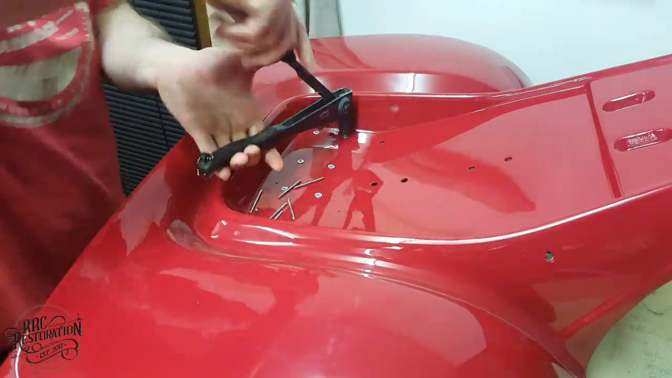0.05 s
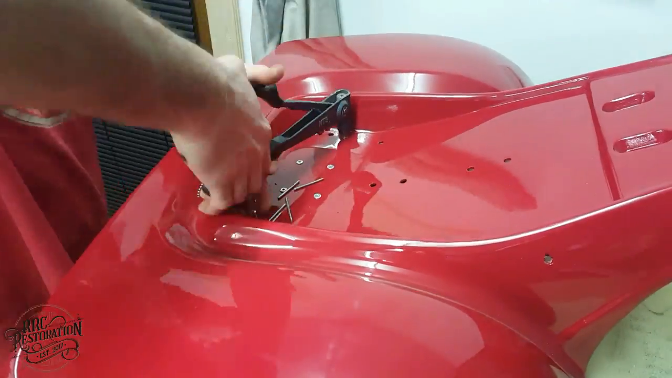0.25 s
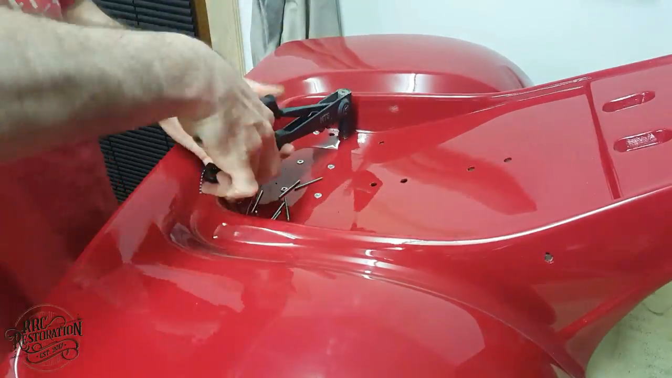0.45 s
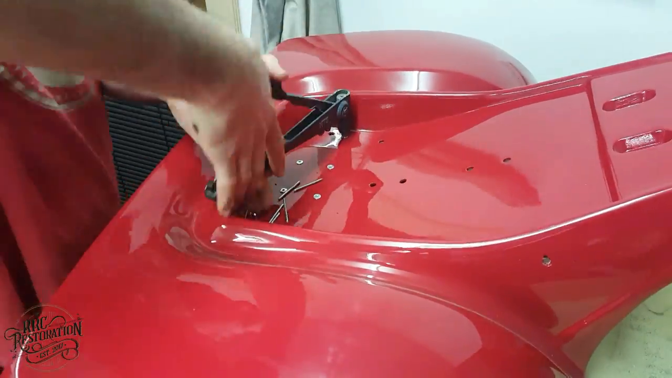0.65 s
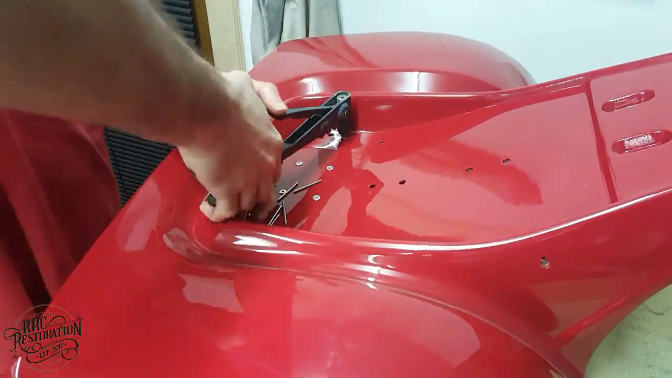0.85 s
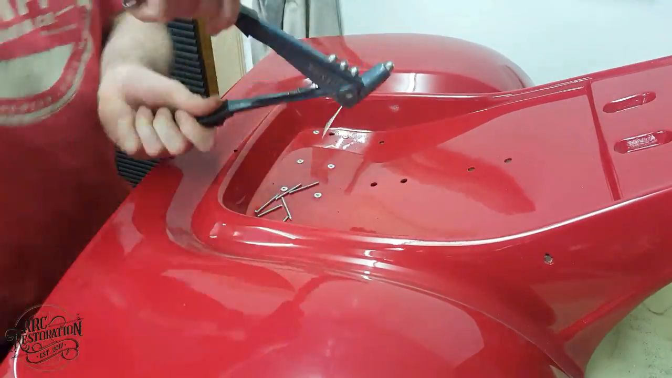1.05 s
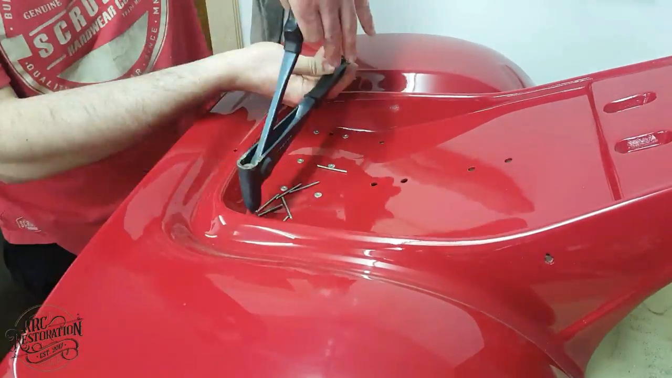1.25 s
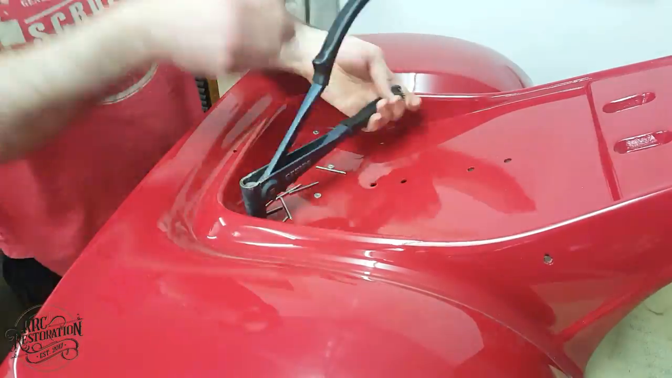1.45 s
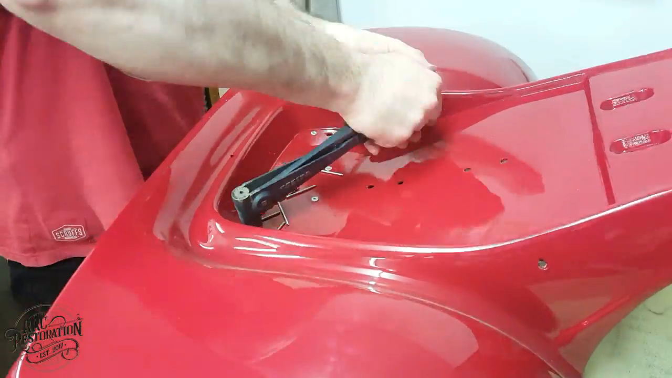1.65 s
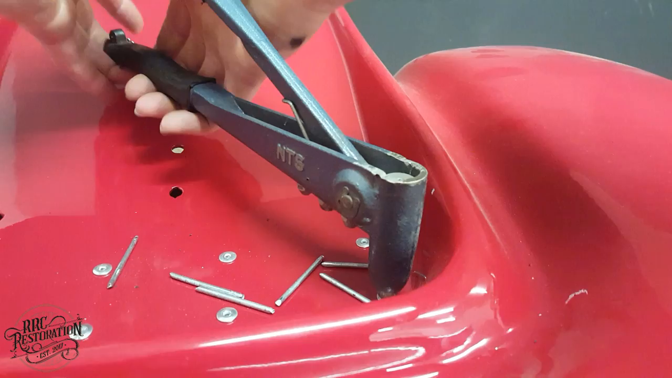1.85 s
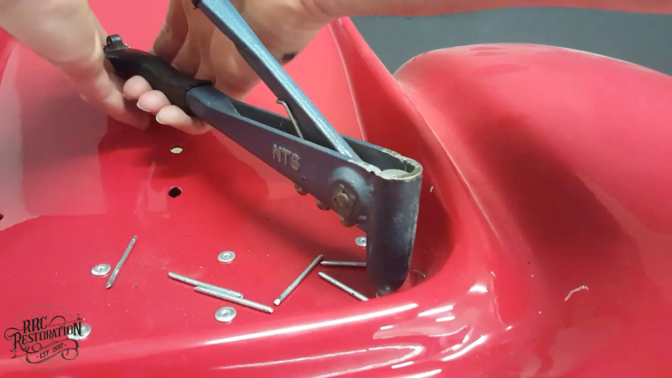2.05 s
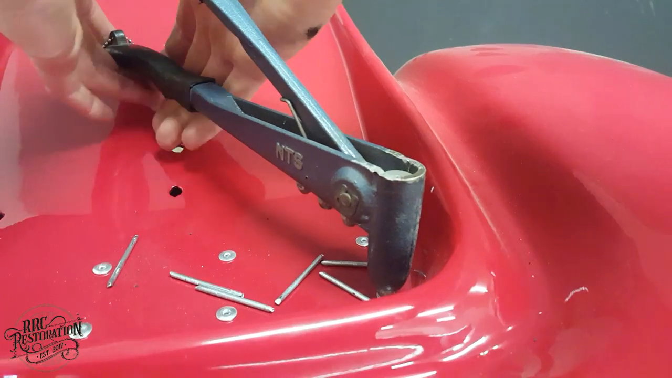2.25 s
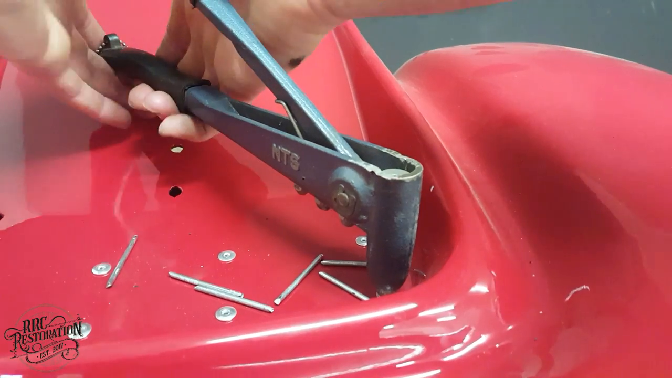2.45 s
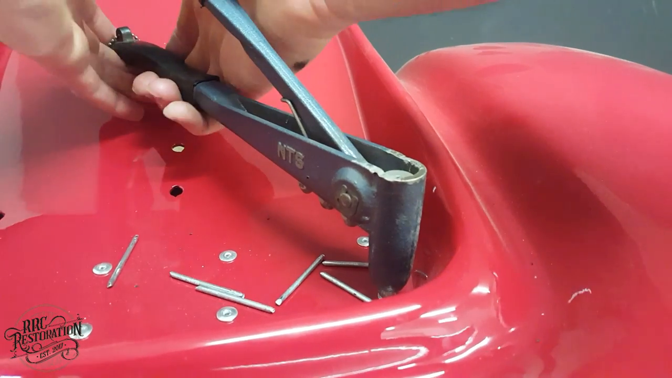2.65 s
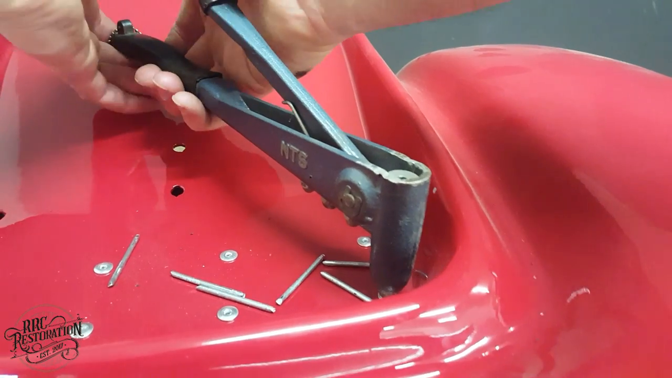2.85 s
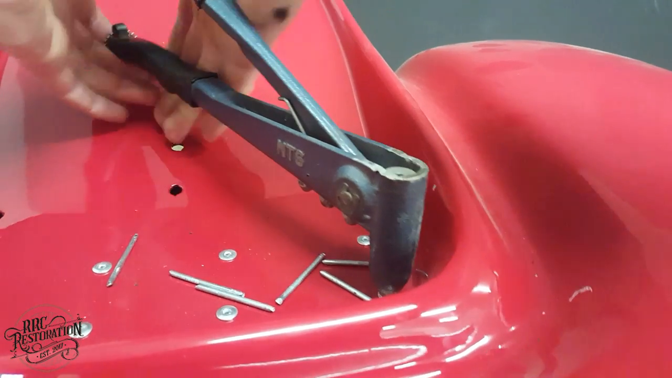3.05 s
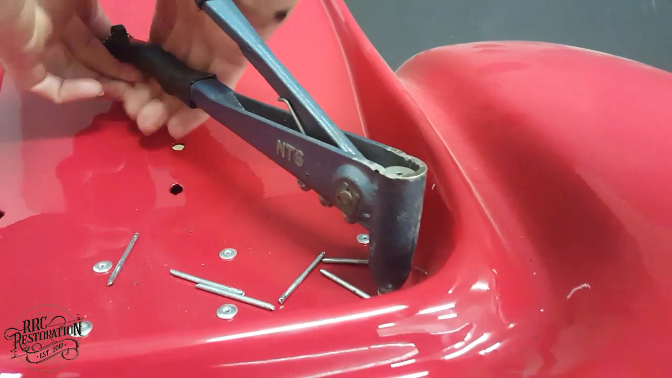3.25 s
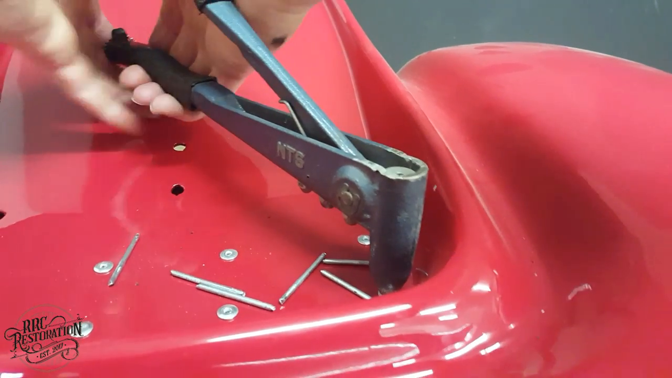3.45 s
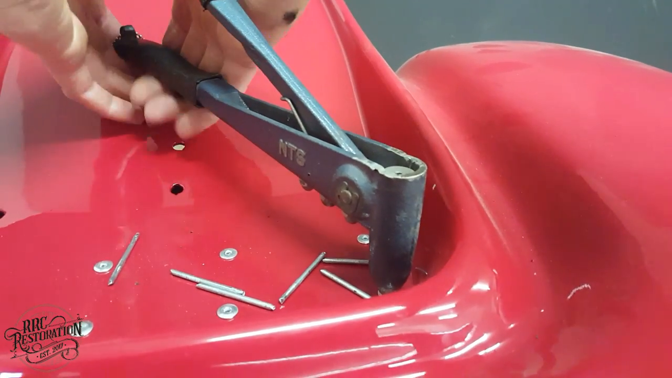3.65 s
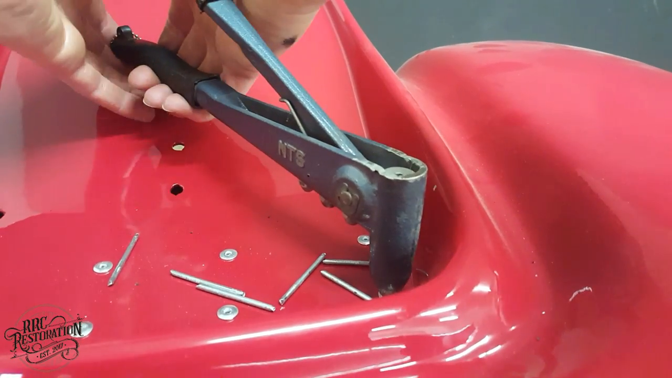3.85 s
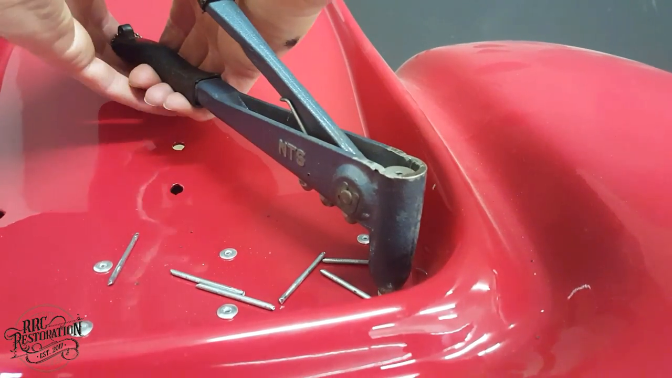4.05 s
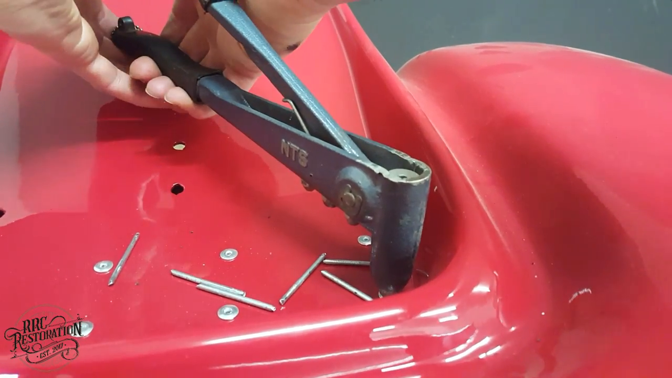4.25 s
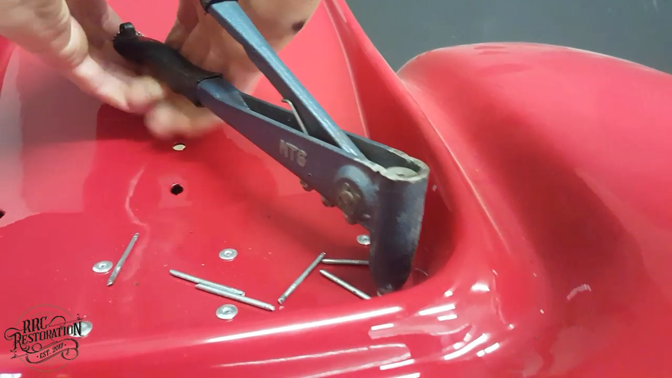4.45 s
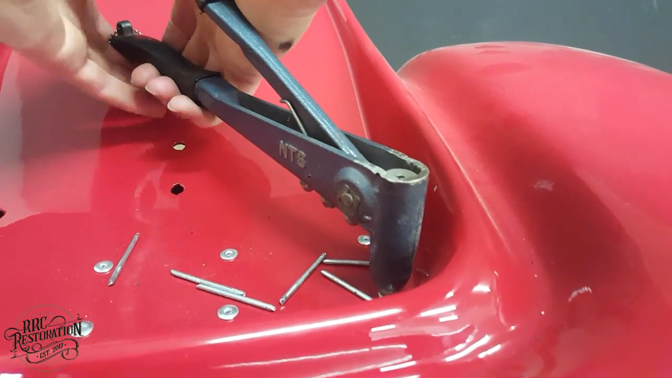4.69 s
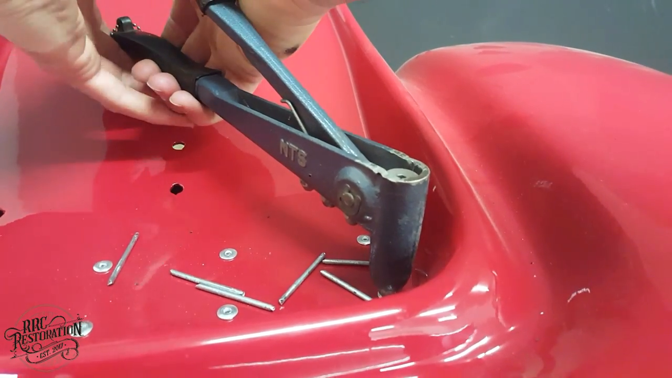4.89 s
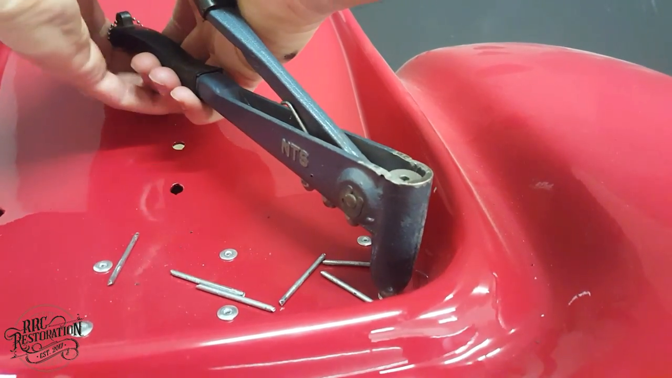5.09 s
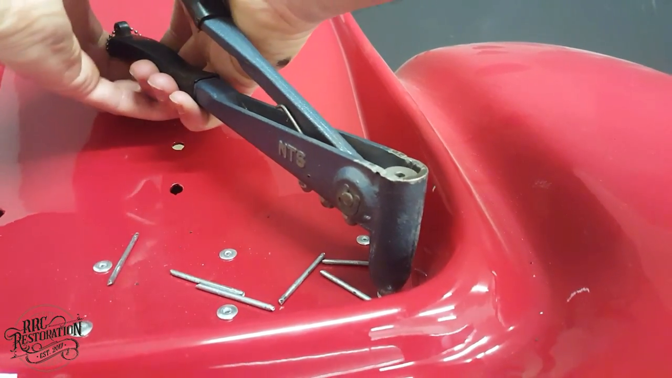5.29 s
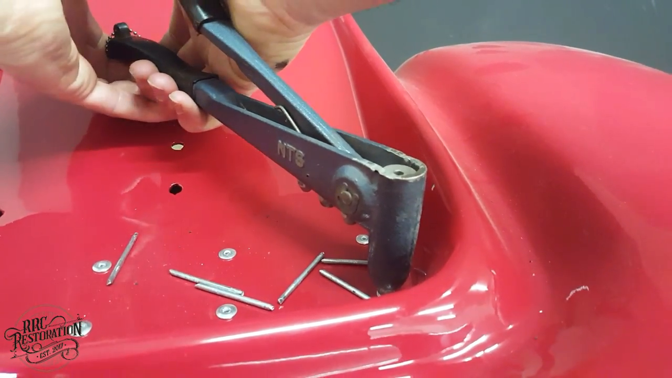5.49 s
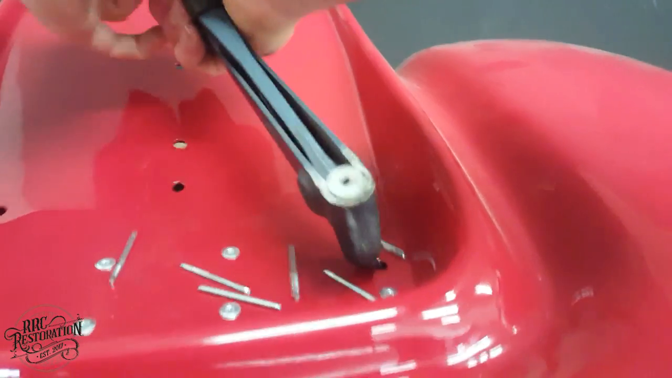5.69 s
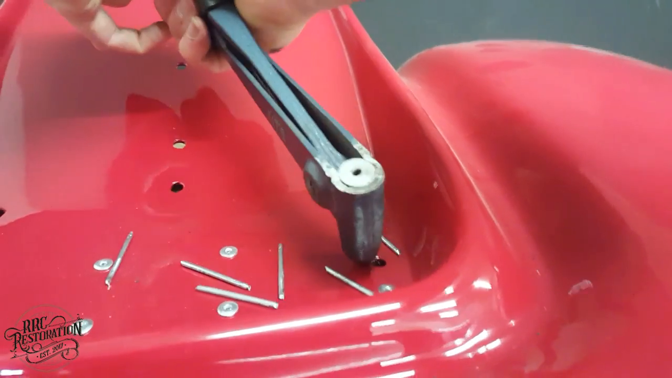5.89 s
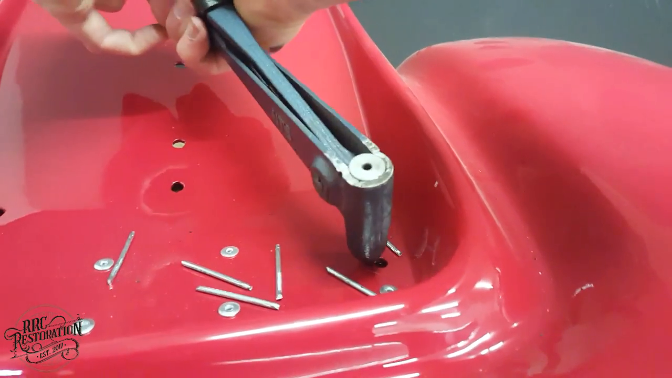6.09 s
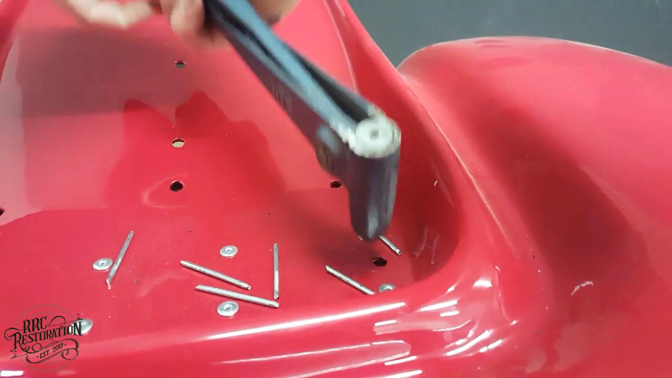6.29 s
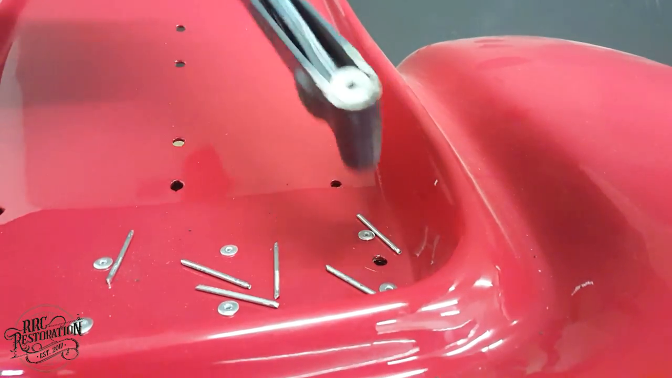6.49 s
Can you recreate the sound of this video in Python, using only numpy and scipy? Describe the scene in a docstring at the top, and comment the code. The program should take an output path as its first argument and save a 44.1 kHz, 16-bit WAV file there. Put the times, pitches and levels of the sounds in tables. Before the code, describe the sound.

A close microphone in a quiet, moderately reverberant workshop. Right at the start a steel hand riveter lands on a hollow fibreglass shell with a thin knock, then bumps and clinks lightly among loose rivets; a heavier low thud falls at 0.6 s. Around 1.0 s comes a sharp hard clack, at 1.15 s a bright steel rattle, and at 1.4 s and 1.8 s full hollow thumps with small bumps around them. From 2 to 4.8 s the seated tool is nudged with soft boxy taps, faint scuffs and clinks; a moderate dull snap comes at 2.85 s. A dry tick sounds at 4.3 s. A faint low wavering hum swells from 4.5 s and sags; quick steel ticks cluster from 5.3 to 5.6 s. At 5.64 s the stem breaks: a huge overloaded crack with immediate recoil, shell ring and room decay of about half a second. Barely audible clinks remain until about 6.5 s.

```python
"""A hand riveter works on a hollow fibreglass shell until the rivet's stem breaks: bursts of tiny impacts excite
resonances, the shell rings as decaying sines, and band-wise decaying noise fills the room with the bang.
Before it the tool knocks the shell (impacts through broad modes), nudges its hole, and its steel jaws tick.
Loose rivets clink and hands fumble; behind them lie filtered noise and a low wavering hum.
Diffuse reflections surround the contacts, and the microphone overloads on the loudest peaks."""
import sys
import numpy as np
from scipy import signal
from scipy.fft import rfft, irfft, next_fast_len
from scipy.io import wavfile

SR = 44100
rng = np.random.default_rng(int(sys.argv[2]) if len(sys.argv) > 2 else 0)


def generate_wav(signal):
    """Clip the signal to [-1, 1] and save it as 16-bit WAV at the path in sys.argv[1]."""
    frames = np.transpose(np.atleast_2d(signal))
    scaled = np.clip(frames, -1, 1) * 32767
    pcm = np.round(scaled).astype(np.int16)
    wavfile.write(sys.argv[1], SR, pcm)


N = 287957
TIME = np.arange(N) / SR


def from_db(db):
    """Level to amplitude: 20 dB is a factor of ten."""
    return 10 ** (np.asarray(db) / 20)


def rms_one(x):
    """Power normalisation: scale to unit rms."""
    return x / np.sqrt(np.mean(x ** 2) + 1e-30)


def unit_energy(x):
    """Energy normalisation: scale the sum of squares to one."""
    return x / np.sqrt(np.sum(x ** 2) + 1e-30)


def at_hz(points, hz):
    """Logarithmic frequency scale: interpolate a table along it."""
    f, value = np.transpose(points)
    return np.interp(np.log(np.maximum(hz, 1)), np.log(f), value)


def add(out, s, sound):
    """Superposition: mix a sound in at s seconds."""
    i = max(int(s * SR), 0)
    out[i:i + len(sound)] += sound[:N - i]


def band(x, low, high, order=3):
    """Causal band-pass filtering between two corner frequencies."""
    return signal.sosfilt(signal.butter(order, [low, high], "band", fs=SR, output="sos"), x)


def lowpass(x, hz, order=1):
    """Causal low-pass filtering, with the corner held below SR / 3."""
    return signal.sosfilt(signal.butter(order, min(hz, SR / 3), fs=SR, output="sos"), x)


def highpass(x, hz, order=2):
    """Causal high-pass filtering above a corner frequency."""
    return signal.sosfilt(signal.butter(order, hz, "high", fs=SR, output="sos"), x)


def steady_noise(colour):
    """Spectral shaping: white noise weighted in frequency, rms 1."""
    weight = from_db(at_hz(colour, np.fft.rfftfreq(N, 1 / SR)))
    return rms_one(irfft(rfft(rng.standard_normal(N)) * weight, N))


def dying_noise(colour, t60s, size=SR):
    """High modal density: noise in third-octave bands, each with its own decay; unit energy."""
    edges = 40 * 2 ** (np.arange(27) / 3)
    out = np.zeros(size)
    for low, high in zip(edges, edges[1:]):
        hz = np.sqrt(low * high)
        fade = from_db(-60 * TIME[:size] / at_hz(t60s, hz))
        noise = band(rng.standard_normal(size) * fade, low, high, order=2)
        # the colour is a level per hertz, so energy grows with bandwidth
        out += unit_energy(noise) * np.sqrt(high - low) * from_db(at_hz(colour, hz))
    return unit_energy(out)


def ring(modes, vary_db, size=SR):
    """Free vibration: exponentially decaying sines whose strengths and signs vary from strike to strike."""
    hz, db, t60 = np.transpose(modes)[:, :, None]
    strength = from_db(db + vary_db * rng.standard_normal(db.shape)) * rng.choice([-1, 1], db.shape)
    decay = from_db(-60 * TIME[:size] / t60)
    return np.sum(strength * decay * np.sin(2 * np.pi * hz * TIME[:size]), axis=0)


def resonate(x, modes):
    """Modal superposition: parallel two-pole resonances with alternating signs."""
    out = 0
    for k, (hz, width, db) in enumerate(modes):
        r = np.exp(-np.pi * width / SR)
        poles = [1, -2 * r * np.cos(2 * np.pi * hz / SR), r * r]
        peak_one = (1 - r * r) / 2
        out = out + (-1) ** k * from_db(db) * peak_one * signal.lfilter([1, 0, -1], poles, x)
    return out


def tinted(x, hz, width_hz, db):
    """Resonant equalisation: raise or lower one region of the spectrum."""
    return x + (from_db(db) - 1) * resonate(x, [(hz, width_hz, 0)])


# corners of the four registers boom, body, clack and crack: (frequency [Hz])
REGISTER_EDGES = [30, 380, 1300, 4500, 17000]
LEVEL_WINDOW_S = .02  # each register's energy is given as its rms level over this time


def contacts(rows, modes, register_db, strike_db, bare_db, bare_hz, rise, settle_db, settle_s, settle_hz,
             lowest_hz, grain_db=2.5, flex_db=-26, size=8192):
    """Impact excitation: a flurry of tiny impacts drives resonances; hardness tilts the four registers."""
    out, t = np.zeros(N), TIME[:size]
    registers = [signal.butter(3, edges, "band", fs=SR, output="sos")
                 for edges in zip(REGISTER_EDGES, REGISTER_EDGES[1:])]
    for s, chatter_s, level_db, hardness_db in rows:
        force, grain, tremble = rng.standard_normal((3, size))
        envelope = (t / chatter_s) ** rise * np.exp(-t / chatter_s)
        flurry = envelope * force * from_db(grain_db * grain)
        # one impact at the height of the flurry is added
        flurry[int(rise * chatter_s * SR)] += from_db(strike_db) * np.sqrt(np.sum(flurry ** 2))
        # afterwards the parts settle with a duller tremble
        settling = lowpass(tremble, settle_hz) * np.exp(-t / settle_s) * (1 - np.exp(-t / chatter_s))
        impacts = flurry + from_db(settle_db) * settling
        # part of the force is heard bare, rounded by the contact's softness
        sound = resonate(impacts, modes) + from_db(bare_db) * lowpass(impacts, bare_hz)
        # below its lowest mode the body only flexes a little
        flex = from_db(flex_db) * lowpass(impacts, lowest_hz, order=2)
        sound = highpass(sound, lowest_hz, order=3) + flex
        # a harder contact is brighter: the tilt pivots between boom and body
        levels = [level_db + db + hardness_db * (k - .5) for k, db in enumerate(register_db)]
        blow = sum(from_db(db) * unit_energy(signal.sosfilt(sos, sound)) for sos, db in zip(registers, levels))
        add(out, s, blow * np.sqrt(LEVEL_WINDOW_S * SR))
    return out


# brief drops of the background: (time [s], depth [dB], recovery time [s])
DIPS = [(1.0, 8, 0.12), (5.651, 12.5, 1)]


def dips():
    """Gain modulation: the background sinks quickly and comes back more slowly."""
    db = 0
    for s, depth_db, recovery_s in DIPS:
        age = np.maximum(TIME - s, 0)
        attack = 1 - np.exp(-age / .015)
        db = db - depth_db * attack * np.exp(-(age / recovery_s) ** 2)
    return from_db(db)


HUM_HZ = 72
HUM_START_S, HUM_ATTACK_S, HUM_END_S, HUM_RELEASE_S = 4.5, 0.44, 5.6, .09
HUM_DB, HUM_SAG_DB_PER_S = -48.5, 9  # the sag counts from the start


def hum_level():
    """Amplitude envelope: the hum swells under the last squeeze, sags, and dies around the stem's break."""
    age = TIME - HUM_START_S
    attack = np.clip(age / HUM_ATTACK_S, 0, 1)
    release = np.exp(-np.maximum(TIME - HUM_END_S, 0) / HUM_RELEASE_S)
    return attack * from_db(HUM_DB - HUM_SAG_DB_PER_S * age) * release


def low_hum(width_hz):
    """Phase modulation: the phase of narrow-band noise makes a tone of wandering pitch and steady strength."""
    narrow = band(rng.standard_normal(N), HUM_HZ - width_hz / 2, HUM_HZ + width_hz / 2, order=2)
    phase = np.angle(signal.hilbert(narrow, next_fast_len(N))[:N])
    return hum_level() * np.sqrt(2) * np.cos(phase)


# spells of fumbling over tool and shell: (start [s], end [s], level [dB])
HANDLING = [(0, .005, -40.5), (.03, .95, -60), (1.321, 1.655, -52.5), (1.83, 2.519, -63.5),
            (3.052, 3.702, -64.5), (4.5, 5.198, -66.5)]
HANDLING_FADE_S, HANDS_STILL_DB = 0.049, -72.5


def hand_activity():
    """Envelope control, in dB: each spell holds its level and fades exponentially at both ends."""
    gain = from_db(HANDS_STILL_DB)
    for start, end, db in HANDLING:
        outside_s = np.abs(TIME - np.clip(TIME, start, end))
        gain = np.maximum(gain, from_db(db) * np.exp(-outside_s / HANDLING_FADE_S))
    return 20 * np.log10(gain)


# relative spectrum of brushing sleeves: (frequency [Hz], level [dB])
RUSTLE_COLOUR = [(80, -7.5), (220, 13), (500, 1.5), (1000, -3), (2000, -9), (4000, -16), (8000, -29),
                 (15000, -36.5)]
RUSTLE_DB, RUSTLE_FOLLOWS = -64.5, 0.55  # level while hands are still, share of their swing in dB


def sleeve_rustle(activity_db):
    """Friction noise: shaped noise that grows as the hands get busier."""
    level_db = RUSTLE_DB + RUSTLE_FOLLOWS * (activity_db - HANDS_STILL_DB)
    return from_db(level_db) * steady_noise(RUSTLE_COLOUR)


# relative spectrum of the room noise: (frequency [Hz], level [dB])
FLOOR_COLOUR = [(25, -6.5), (65, -0.5), (130, -7), (230, -17), (500, -23), (1300, -34.5), (4000, -35.5),
                (15000, -43)]


def background(activity_db, floor_db, hum_width_hz):
    """Incoherent superposition: room noise and rustle share the dips; the hum does not."""
    rustle = sleeve_rustle(activity_db)
    floor = from_db(floor_db) * steady_noise(FLOOR_COLOUR)
    return dips() * (floor + rustle) + low_hum(hum_width_hz)


# reverberation time of the room: (frequency [Hz], t60 [s])
ROOM_T60 = [(100, 0.36), (250, 0.57), (600, 0.59), (1100, 0.6), (2000, .46), (4200, 0.41), (7700, .35),
            (11000, 0.04), (15000, .23)]


def workshop(x, wall_hz, first_echo_s):
    """Diffuse reverberation: convolution with decaying noise, dulled by the walls."""
    response = dying_noise([(100, 0.0084), (10000, 0.0028)], ROOM_T60)  # practically flat colour
    gather = 1 - np.exp(-(TIME[:SR] / first_echo_s) ** 2)
    return signal.fftconvolve(x, lowpass(response, wall_hz) * gather)[:N]


# broad resonances of the struck shell: (frequency [Hz], width [Hz], level [dB])
KNOCK_MODES = [(204.6, 39, -9.5), (427, 47, -2.5), (605, 120, -0.5), (940, 170, -2.5), (1117, 140, -10),
               (1760, 17, -16), (1780, 45, -12), (2836, 190, -10.5), (2980, 210, -32.5), (5840, 230, -38.5)]


def fumbling(activity_db, per_s, spread_db, bare_db, bare_hz, scuff_s):
    """Shot noise: random touches start decaying scuffs that sound through the shell."""
    touches = (rng.random(N) < per_s / SR) * from_db(spread_db * np.minimum(rng.exponential(1, N), 3))
    # the tiny offset keeps the filter's input above zero
    envelope = signal.lfilter([1], [1, -np.exp(-1 / (scuff_s * SR))], touches + 1e-18)
    scuffs = envelope * rng.standard_normal(N)
    sound = highpass(resonate(scuffs, KNOCK_MODES) + from_db(bare_db) * lowpass(scuffs, bare_hz), 130)
    return from_db(activity_db) * rms_one(sound)


# clinks of loose rivets and linkage: (time [s], chatter time [s], level [dB], hardness [dB per register])
CLINKS = [(0.083, 0.003, -54.5, 4), (0.282, 0.0022, -53, -5), (0.305, 0.005, -50, -3.5),
          (0.347, 0.0026, -37.5, -2), (0.744, .006, -31.5, -1.8), (0.864, 0.0025, -55.5, 1),
          (1.085, 0.0072, -59, 4.5), (1.116, 0.0073, -61, 5), (1.143, 0.0024, -27, 1.5),
          (1.158, 0.007, -32, 1.1), (1.866, 0.0035, -53, -2.5), (1.963, 0.009, -55, -4),
          (2.003, 0.012, -47.5, -7), (2.085, .0019, -65.5, 6.7), (2.339, 0.0028, -50.5, -9),
          (2.59, 0.0079, -52, -4.5), (3.039, 0.0064, -62.5, 5), (3.064, 0.0033, -55, 0),
          (3.139, 0.0018, -50.5, 0.3), (3.572, 0.00177, -68, 4), (4.526, .0041, -48.5, -0.8),
          (4.686, .0037, -55, -3.5), (5.147, 0.0066, -51.5, -7), (5.27, 0.0045, -54, -3.5),
          (6.124, 0.0034, -59.5, 0), (6.268, 0.0017, -66, -2), (6.447, .003, -62, -7),
          (6.508, 0.0089, -65.5, 3)]
# resonances of small steel parts: (frequency [Hz], width [Hz], level [dB])
STEEL_MODES = [(222, 39, -9), (726, 100, 9), (1130, 300, -11.5), (1846, 120, 10.5), (2920, 750, -4),
               (3610, 560, 4), (4360, 100, -7), (5800, 47, -4), (8500, 310, -18), (12900, 810, -39)]
# register balance at hardness 0: (boom [dB], body [dB], clack [dB], crack [dB])
CLINK_REGISTERS = (-9, -0.15, -0.4, -16.5)


def steel_clinks():
    """Impact excitation of small steel parts: loose rivets and the tool's linkage."""
    return contacts(CLINKS, STEEL_MODES, CLINK_REGISTERS, strike_db=-10.5, bare_db=2.0, bare_hz=6000, rise=.8,
                    settle_db=-8, settle_s=0.011, settle_hz=3955, lowest_hz=178)


# register balance at hardness 0: (boom [dB], body [dB], clack [dB], crack [dB])
KNOCK_REGISTERS = (2.5, -3, -13, -37)


def shell_knocks(rows):
    """Impact excitation of a hollow shell by steel."""
    return contacts(rows, KNOCK_MODES, KNOCK_REGISTERS, strike_db=-8, bare_db=-9.5, bare_hz=2410, rise=1.0,
                    settle_db=-10, settle_s=.011, settle_hz=2400, lowest_hz=132, flex_db=-28.5)


FIRST_TOUCH_S, FIRST_TOUCH_CHATTER_S, FIRST_TOUCH_HARDNESS_DB = .012, 0.0033, 1.9
LANDING_CHATTER_S, LANDING_HARDNESS_DB = 0.0026, 0.8
REBOUND_DB, REBOUND_CHATTER_S = -34.5, .003
SPOT_WIDTH_HZ, SPOT_DB = 110, 4.5


def landing(s, db, first_db, rebound_s, spot_hz):
    """Successive impacts: an edge touches, the full weight lands, and the tool rebounds once."""
    rows = [(s - FIRST_TOUCH_S, FIRST_TOUCH_CHATTER_S, first_db, FIRST_TOUCH_HARDNESS_DB),
            (s, LANDING_CHATTER_S, db, LANDING_HARDNESS_DB),
            (s + rebound_s, REBOUND_CHATTER_S, REBOUND_DB, 0)]
    return tinted(shell_knocks(rows), spot_hz, SPOT_WIDTH_HZ, SPOT_DB)


# the tool bumps the shell: (time [s], chatter time [s], level [dB], hardness [dB per register])
KNOCKS = [(0.144, 0.0051, -48, 1), (0.468, 0.0036, -45.5, -0.2), (0.5395, 0.0021, -29.5, 0.5),
          (0.709, 0.0052, -43, 1), (0.844, 0.0063, -46, 0.5), (0.915, 0.0051, -42.5, -3.5),
          (0.982, 0.0045, -17.5, 10), (1.291, 0.0035, -44.5, -2), (1.315, 0.0027, -34, -1.6),
          (1.3604, 0.0019, -33, -2.5), (1.505, 0.0039, -45.5, 0), (1.576, 0.0057, -38.5, -3),
          (1.606, .0025, -39.5, -1.5), (1.628, .0034, -33, -6.5), (1.682, 0.0046, -48.5, -5),
          (1.761, .0024, -33, -2)]
# the tool is set down heavily:
# (time [s], level [dB], first touch level [dB], rebound delay [s], pitch the struck spot favours [Hz])
LANDINGS = [(0.038, -20.5, -23, 0.055, 840), (0.588, -15.5, -25, .042, 208),
            (1.4044, -13.5, -28.5, .069, 447), (1.7917, -20, -31, 0.026, 620)]
MOVED_S = 1.1
NODE_HZ, NODE_WIDTH_HZ, NODE_DB = 416, 260, -6.5


def knocking():
    """Modal nodes: until it is moved the tool rests where the middle resonances hardly move, and sounds thin."""
    sound = shell_knocks(KNOCKS) + sum(landing(*row) for row in LANDINGS)
    return np.where(TIME < MOVED_S, tinted(sound, NODE_HZ, NODE_WIDTH_HZ, NODE_DB), sound)


# the grip nudges the tool in its hole:
# (time [s], chatter time [s], level [dB], delay before it rocks back [s], 0 for none)
NUDGES = [(2.057, 0.0034, -40.5, 0.01), (2.147, 0.0023, -48, 0), (2.311, .002, -41, 0.0018),
          (2.419, 0.0061, -47, 0.001), (2.452, .005, -41, 0.00011), (3.081, 0.004, -34, 0.0012),
          (3.199, 0.0015, -40, 0.0017), (3.432, 0.0026, -41, .016), (3.602, .0024, -41, .032),
          (3.813, 0.0019, -40, 0.00018), (3.931, 0.0029, -44.5, .02), (4.545, 0.0029, -38, 0.0018),
          (4.605, 0.0099, -46.5, 0.00082), (4.755, 0.003, -43, 0.019)]


def nudge_contacts():
    """Two-sided contact: the nose meets one side of the hole, and the other if it rocks back."""
    pushes = [(s, chatter_s, db, 0) for s, chatter_s, db, _ in NUDGES]
    # the return is slightly weaker than the push
    returns = [(s + back_s, chatter_s, db - 1.1, 0) for s, chatter_s, db, back_s in NUDGES if back_s > 0]
    return pushes + returns


# broad resonances with the tool seated in its hole: (frequency [Hz], width [Hz], level [dB])
SEATED_MODES = [(216.6, 46, -2.5), (321, 123, 1), (472.4, 46, 6), (608, 112, 2), (845, 110, 4),
                (1125, 79, -7.5), (2020, 340, -18), (3030, 130, -8), (5560, 800, -20)]
# register balance at hardness 0: (boom [dB], body [dB], clack [dB], crack [dB])
NUDGE_REGISTERS = (2, -0.5, -18.5, -37)


def seated_nudges():
    """Impact excitation of coupled bodies: the seated tool and the shell sound together."""
    return contacts(nudge_contacts(), SEATED_MODES, NUDGE_REGISTERS, strike_db=-16, bare_db=-12.0, bare_hz=3410,
                    rise=0.93, settle_db=-27, settle_s=0.032, settle_hz=1780, lowest_hz=142.0)


# ticks in the jaws: (time [s], relative level [dB])
TICKS = [(4.281, -35.5), (5.339, -29), (5.429, -28), (5.493, -41), (5.519, -32), (5.561, -31),
         (5.597, -40.5)]
# relative spectrum of the dry click: (frequency [Hz], density [dB per Hz])
TICK_COLOUR = [(150, -16), (500, 15), (1100, 16.5), (2000, -2), (2800, 0.5), (4500, -10), (6000, -5.5),
               (8000, -18.5), (15000, -18.5)]
# ring of the steel jaws: (frequency [Hz], relative level [dB], t60 [s])
JAW_RING = [(1507, -19, .04), (2557, -1, .035), (2690, -2, .02), (2859, -4, .028), (3418, -17, .035),
            (3962, -16, .055), (5400, -14, .015), (5900, -13, .018), (9900, -24, .02)]


def jaw_ticks(click_db, ring_db, click_t60):
    """Stick-slip: the jaws slip on the stem with a dry click and a short steel ring."""
    out = np.zeros(N)
    for s, db in TICKS:
        click = dying_noise(TICK_COLOUR, [(1000, click_t60)], size=4096)
        add(out, s, from_db(db + click_db) * click)
        add(out, s, from_db(db + ring_db) * ring(JAW_RING, vary_db=1, size=4096))
    return out


# the jaws let go, later the stem breaks and the tool recoils:
# (time [s], chatter time [s], level [dB], hardness [dB per register])
SNAPS = [(2.852, 0.006, -26, -2), (5.643, .0027, -5, 5), (5.6695, .0018, -20.5, -9)]
# register balance at hardness 0: (boom [dB], body [dB], clack [dB], crack [dB])
SNAP_REGISTERS = (-4, 1, -2, -12)


def snap_cracks():
    """Sudden release of load: the jumping tool strikes the shell's modes."""
    return contacts(SNAPS, KNOCK_MODES, SNAP_REGISTERS, strike_db=-5.5, bare_db=5.5, bare_hz=4600, rise=0.73,
                    settle_db=-21.5, settle_s=0.028, settle_hz=5000, lowest_hz=176, grain_db=0.0)


# the room answers the two loud jumps: (time [s], level of the whole answer's energy [dB])
BANGS = [(2.852, -11), (5.643, 24)]
# relative spectrum of the room's answer: (frequency [Hz], density [dB per Hz])
BANG_COLOUR = [(40, -31.5), (85, -29.5), (140, -5), (230, 1), (480, -1), (850, -4), (1200, -2),
               (1800, -8.5), (2500, -7), (4000, -11), (6000, -19), (9000, -24.5), (15000, -34.5)]
# free ring of the shell: (frequency [Hz], relative level [dB], t60 [s])
SHELL_RING = [(141, -18, .4), (203, -17, .37), (261, -17, .37), (324, -15, .38), (370, -16, .37),
              (447, -16, .45), (476, -18, .46), (561, -18, .38), (588, -15, .38), (714, -25, .46),
              (785, -22, .5), (824, -16, .37), (932, -17, .39), (1046, -22, .5), (1087, -14, .37),
              (1168, -25, .55), (1197, -17, .4), (1281, -21, .38), (1512, -25, .42), (2255, -23, .35),
              (2394, -19, .33), (2561, -24, .35)]


def snaps(ring_db, build_s):
    """Transient response: a crack, the shell's free ringing and the room's reverberation."""
    out = snap_cracks()
    # reflections take a moment to gather
    gather = 1 - np.exp(-(TIME[:SR] / build_s) ** 2)
    for s, db in BANGS:
        add(out, s, from_db(db) * dying_noise(BANG_COLOUR, ROOM_T60) * gather)
        add(out, s, from_db(db + ring_db) * ring(SHELL_RING, vary_db=3.5))
    return out


def scene():
    """Superposition of direct sound, reverberation and background."""
    activity_db = hand_activity()
    knocks = knocking()
    clinks = steel_clinks()
    nudges = seated_nudges()
    ticks = jaw_ticks(click_db=6, ring_db=-9.0, click_t60=.03)
    fumble = fumbling(activity_db, per_s=49, spread_db=3.5, bare_db=-19, bare_hz=2780, scuff_s=0.0083)
    send = from_db(-41.0) * (knocks + clinks) + from_db(-12.5) * nudges + from_db(-14.0) * ticks
    room = workshop(send, wall_hz=5000, first_echo_s=0.0031)
    direct = knocks + clinks + nudges + ticks + fumble + snaps(ring_db=-22.5, build_s=0.016)
    return (direct + room + background(activity_db, floor_db=-60.0, hum_width_hz=9.4))[None]


def record(dry):
    """Amplitude saturation: the microphone overloads smoothly towards a ceiling, then the top is cut."""
    ceiling, cutoff_hz = .72, 16000
    clipped = dry / (1 + (dry / ceiling) ** 6) ** (1 / 6)
    return signal.sosfilt(signal.ellip(10, .2, 80, cutoff_hz, fs=SR, output="sos"), clipped)


dry = scene()
out = record(dry)
generate_wav(out)
```